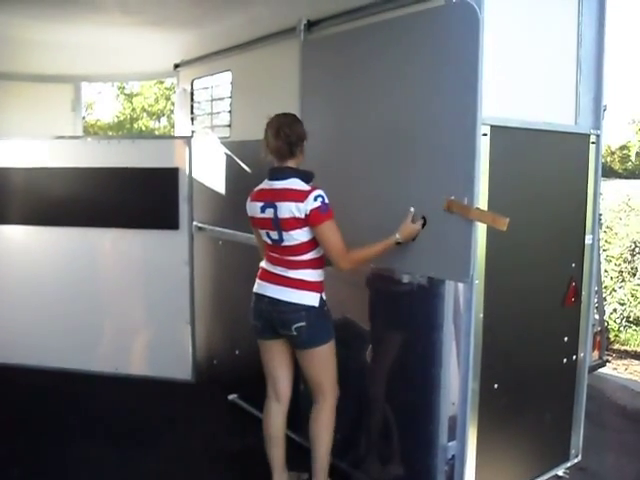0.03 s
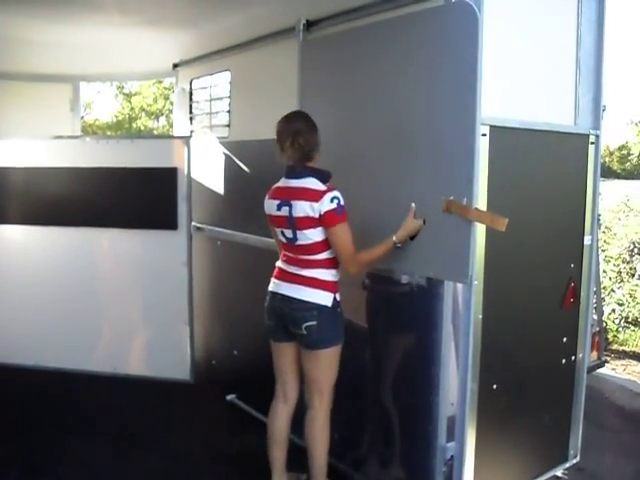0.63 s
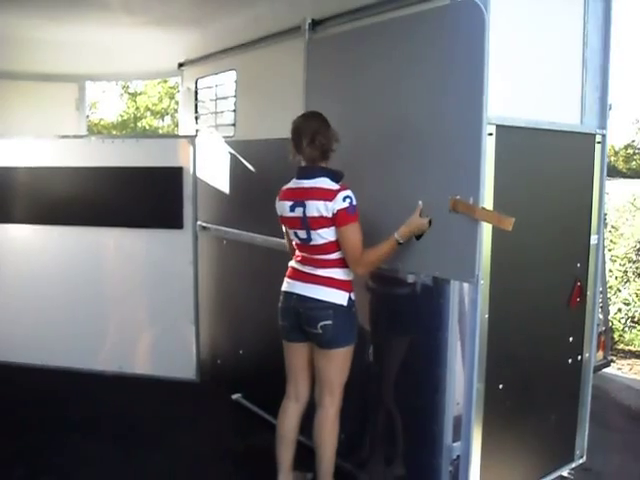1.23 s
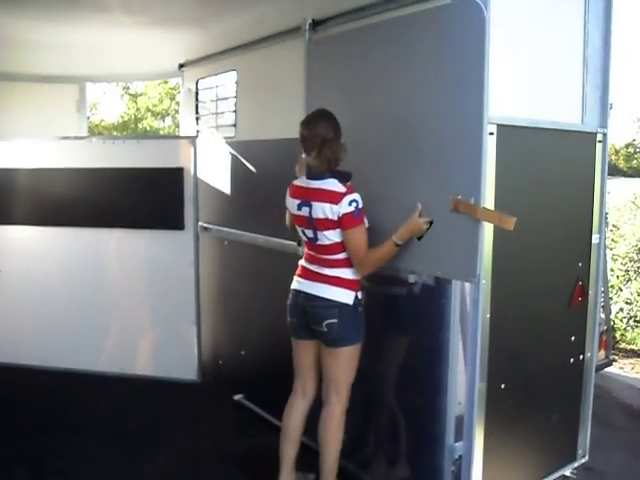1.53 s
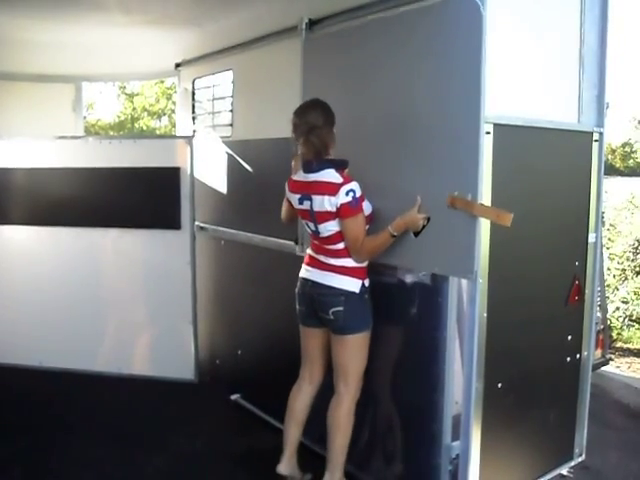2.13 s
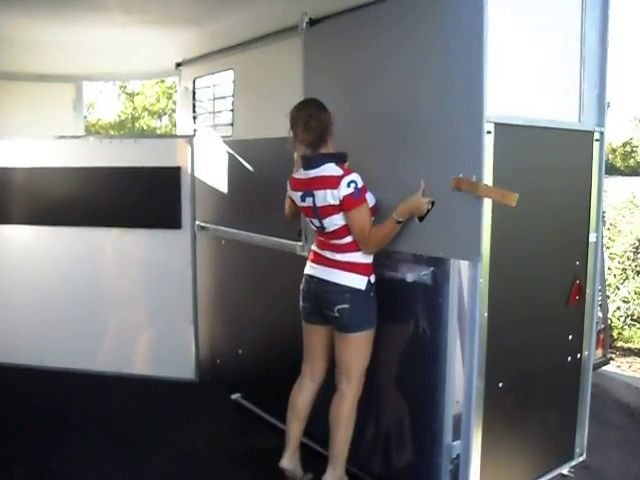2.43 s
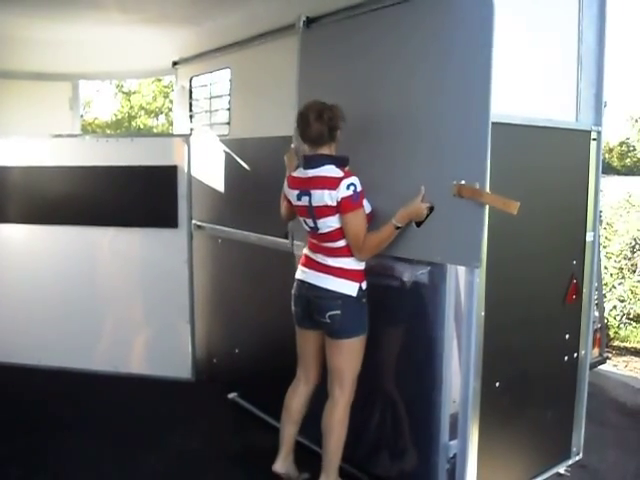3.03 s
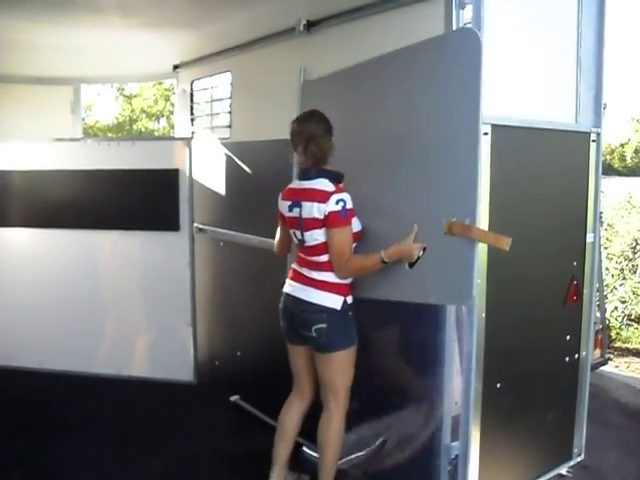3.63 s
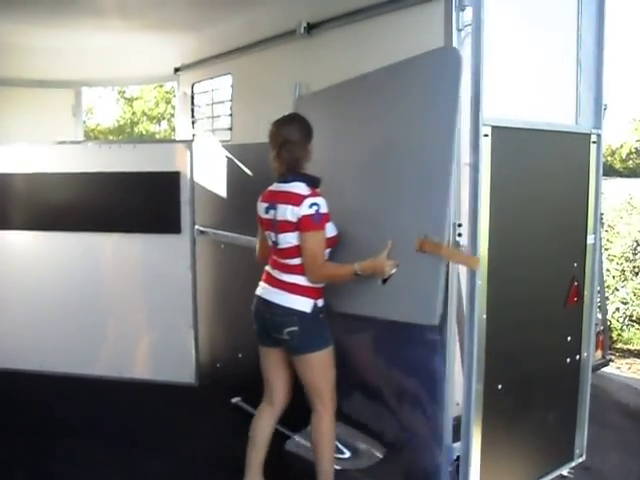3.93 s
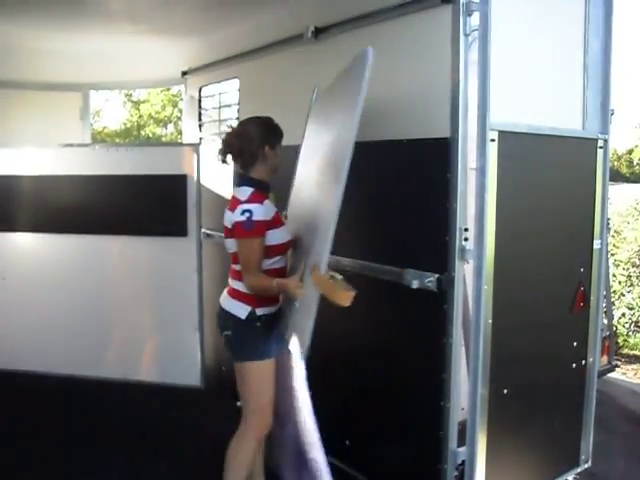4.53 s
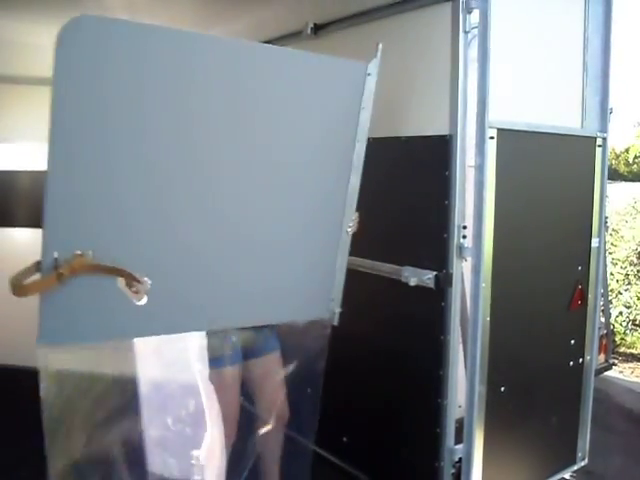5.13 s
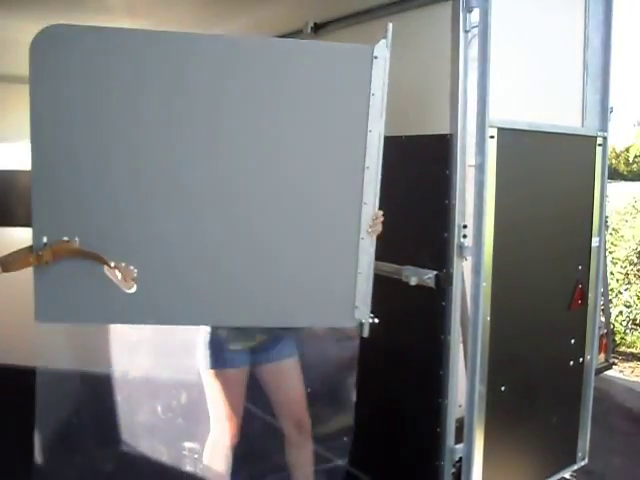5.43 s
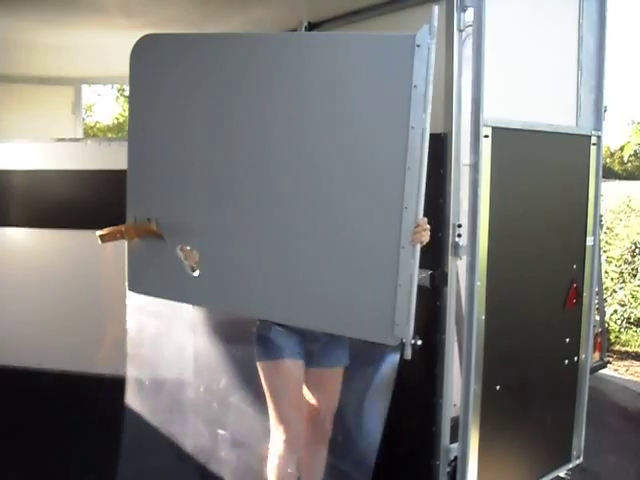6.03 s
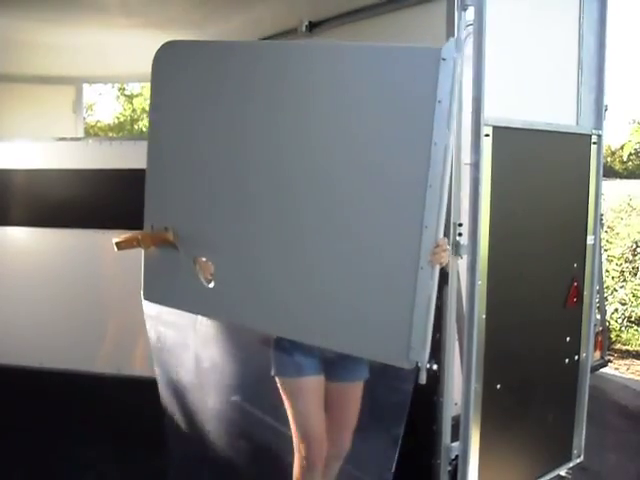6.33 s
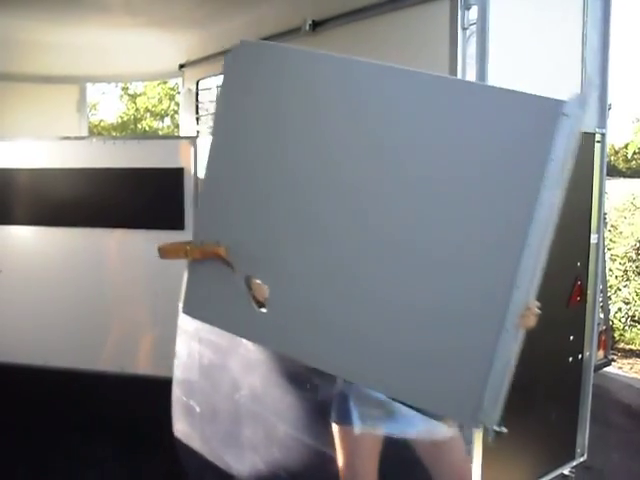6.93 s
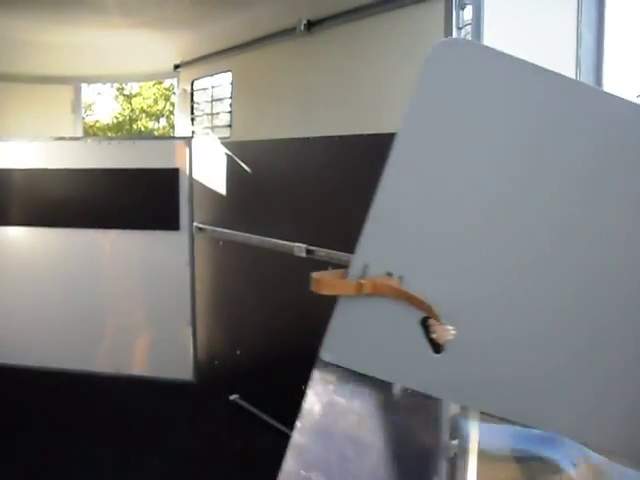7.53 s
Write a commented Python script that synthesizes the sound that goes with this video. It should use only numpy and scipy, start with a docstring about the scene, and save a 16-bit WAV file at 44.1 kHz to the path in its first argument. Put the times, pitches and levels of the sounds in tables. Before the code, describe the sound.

Inside a horse trailer, faint distant traffic hisses throughout, with a barely audible cricket and a few tiny ticks at first. At about 1.8 seconds a heavy divider panel rubs and knocks on its steel hinge pins. It scrapes again, and around 2.3 seconds comes a quick cluster of loud, hollow, ringing clunks with steel clacks and a short echo off the walls. More scrapes and three separate clunks follow between 2.9 and 3.5 seconds. A breeze, puffing lightly from about 2 seconds, rumbles and thumps on the microphone most strongly from 4 to 6.5 seconds. Under it, fittings tick, the panel's plastic skirt rustles softly, and lighter knocks land at 4.6 and 5.3 seconds. Near 5.9 seconds the plastic buckles with one short, blunt squeak. Sharper metal ticks sound just after 7 seconds, followed by a soft, dull scrape.

```python
"""Inside a horse trailer, a heavy divider panel is worked off its hinge pins.
It scrapes and clunks: each blow is a boom, a ring, a hollow knock and a steel clack, with a short tail
off the walls. Its steel fittings tick; its plastic skirt rustles and buckles once with a blunt squeak.
Underneath, distant traffic hisses, a cricket chirps faintly and a breeze puffs at the microphone."""
import sys
import numpy as np
from scipy import signal
from scipy.fft import rfft, irfft, next_fast_len
from scipy.io import wavfile
from scipy.ndimage import map_coordinates

SR = 44100
rng = np.random.default_rng(int(sys.argv[2]) if len(sys.argv) > 2 else 0)


def transcribe(signal):
    """Save signal, clipped to [-1, 1], as a 16-bit WAV file at the path in sys.argv[1]."""
    frames = np.atleast_2d(signal).T
    limited = np.clip(frames, -1, 1)
    pcm = np.round(limited * 32767).astype(np.int16)
    wavfile.write(sys.argv[1], SR, pcm)


N = 343980
TIME = np.arange(N) / SR
HIT_TIME = TIME[:SR // 3]  # seconds within a one-shot

# Table levels are relative: each layer adds its own trim.
# fader ride of the distant traffic: (time [s], level [dB])
TRAFFIC_RIDE = [(0.0, -49), (0.41, -51), (1.17, -51), (1.58, -46.5), (2.13, -50.5), (2.39, -48),
                (2.85, -50.5), (6.5, -54), (7.8, -53)]
# tone of the traffic, the low outdoor murk and the microphone's hiss: (frequency [Hz], level [dB])
TRAFFIC_EQ = [(100, 1), (450, -11), (700, 0.5), (950, 3.5), (1400, -3), (2100, -9), (3000, -19),
              (6000, -69)]
MURK_EQ = [(40, -22), (120, -2), (300, -0.5), (450, -7), (800, -11), (2000, -83)]
HISS_EQ = [(500, 1.5), (4000, 4), (6800, 0), (7400, 6), (7800, 1.5), (8300, 6), (8800, -1), (10200, -1),
           (11000, -19)]
# a far motor's hum and a thin electronic whine: (centre [Hz], half-width [Hz], level [dB])
HUM_BANDS = [(92.9, 8.5, -55), (184.1, 4.6, -60.5), (7800, 80, -72.5)]

# fader ride of the breeze between gusts: (time [s], level [dB])
BREEZE_RIDE = [(0.0, -51.5), (1.39, -48), (1.58, -48), (2.24, -39.5), (3.1, -48.5), (3.56, -37),
               (3.87, -44.5), (4.13, -37), (5.87, -40), (6.06, -41.5), (6.91, -45), (7.8, -46)]
# tone of the wind rumble and of the fine turbulence in an eddy: (frequency [Hz], level [dB])
RUMBLE_EQ = [(10, -8), (30, 2.5), (60, 0), (100, -6), (160, -13.5), (260, -29), (500, -31), (1500, -79)]
FLUTTER_EQ = [(60, 0.5), (150, 4), (260, -3), (350, -13.5), (600, -30.5), (2000, -75)]
# gusts at the microphone: (time [s], length [s], level [dB])
GUST_CUES = [(1.836, 0.088, -38.5), (2.084, 0.055, -38.5), (2.717, 0.072, -41), (4.114, .19, -36.5),
             (4.354, 0.13, -39), (4.76, 0.045, -34), (4.883, 0.12, -35.5), (5.086, 0.06, -34),
             (5.465, 0.215, -35), (5.856, 0.12, -33), (6.33, 0.13, -33), (6.862, 0.22, -38.5)]
# hard eddies thumping the microphone: (time [s], level [dB], width [s])
EDDY_CUES = [(4.12, -22.5, 0.0034), (4.204, -23.5, .0035), (4.292, -19, .003), (4.377, -18.5, 0.00094),
             (4.392, -18, 0.0019), (4.474, -21, 0.0011), (4.784, -22, 0.0019), (4.962, -16.5, 0.0035),
             (5.089, -22.5, 0.0042), (5.327, -18, .0022), (5.506, -18.5, .0017), (6.413, -23, 0.0013),
             (6.451, -21, 0.0015)]

# reverb time of the trailer: (frequency [Hz], t60 [s])
TRAILER_DECAY = [(150, 0.5), (500, 0.38), (1500, 0.2), (4000, 0.25), (10000, 0.072)]
# the plastic skirt sliding: (time [s], length [s], level [dB])
RUSTLE_CUES = [(.01, 0.046, -57), (2.74, 0.053, -61), (4.111, 0.077, -63), (4.177, 0.075, -54.5),
               (4.628, 0.086, -61), (4.863, 0.08, -61)]
# light ticks of the fittings: (time [s], level [dB], pitch [Hz])
TICK_CUES = [(0.0417, -55, 3930), (1.378, -54.5, 4150), (2.747, -51.5, 3650), (3.4018, -57, 3000),
             (3.6535, -55, 3230), (3.702, -54, 4040), (4.1333, -52, 3800), (4.7285, -50, 3650),
             (4.747, -52, 3400), (4.7629, -48, 3670), (4.8998, -48.5, 3300), (6.509, -58, 4600),
             (7.107, -42, 1480), (7.1637, -39, 1640), (7.163, -44, 3000)]
# tone of the plastic skirt and of steel on steel: (frequency [Hz], level [dB])
SKIRT_EQ = [(800, -30), (2500, 0.5), (4500, 3), (6500, -2.5), (10000, -17)]
STEEL_EQ = [(500, -21), (1400, 4), (2200, 0), (2900, 2), (4000, -3), (5200, -10), (7000, -15.5),
            (11000, -32)]

# tone of the whole panel flexing and of its dense resonances: (frequency [Hz], level [dB])
BOOM_EQ = [(30, -45), (80, -6), (150, 5.5), (250, 1), (400, -6), (550, -13), (1500, -70)]
BODY_EQ = [(60, -43), (140, -3), (400, 4.5), (560, -4.5), (750, -0.5), (1400, -6.5), (2100, -15),
           (3000, -34), (6000, -61)]
# ringing modes of the panel and of the hinge pin: (frequency [Hz], level [dB], t60 [s])
PANEL_RING = [(242, 9.5, 0.24), (377, 7, 0.17), (420, 3, 0.19), (479, -9, 0.32), (517, 0, 0.16),
              (604, 13, 0.12), (707, -7, 0.085), (811, -19.5, 0.33), (983, -35, 0.27), (1137, -14, 0.18),
              (1475, -7, 0.039), (1720, -38, 0.4)]
PIN_RING = [(2253, 7, 0.071), (3040, 8, 0.047), (2980, -11, 0.079), (3960, -1, 0.11), (4520, -22, .07)]
# the panel rubbing on its pins and the wall: (time [s], length [s], level [dB], high cut [Hz])
SCRAPE_CUES = [(1.831, 0.083, -38, 294), (2.171, 0.14, -35.5, 1700), (2.918, 0.13, -44, 570),
               (3.21, 0.092, -34.5, 2520), (4.639, 0.042, -43.5, 1200), (5.29, 0.06, -42.5, 2800),
               (7.432, 0.17, -45.5, 484)]
# blows on the hinge: (time [s], rebound gap [s], boom [dB], ring [dB], knock [dB], clack [dB])
CLUNK_CUES = [(1.824, 0.024, -51, -46, -38.5, -55), (2.206, 0.035, -40, -44, -39, -50),
              (2.267, 0.021, -43, -44, -35.5, -54), (2.311, 0.017, -29.5, -31, -35, -44),
              (2.3269, 0.007, -35.5, -33, -34.5, -39.5), (2.337, .015, -29, -25.5, -26.5, -49),
              (3.0281, 0.019, -42.5, -44, -34.5, -43.5), (3.2481, 0.0092, -39.5, -40, -34, -39),
              (3.4741, .016, -31.5, -31, -29.5, -45.5), (4.576, 0.031, -50, -50, -41.5, -51),
              (5.313, 0.017, -46, -52, -40.5, -49)]


def amp(db):
    """Decibels to gain."""
    return 10 ** (np.asarray(db) / 20)


def unit(x):
    """Scale to rms 1."""
    return x / np.sqrt(np.mean(x ** 2) + 1e-20)


def along(points, hz):
    """Read (frequency [Hz], value) points on a log frequency axis."""
    point_hz, values = np.transpose(points)
    return np.interp(np.log(hz + 1), np.log(point_hz + 1), values)


def ride(rows):
    """A fader ride: (time [s], level [dB]) rows read at every sample."""
    return np.interp(TIME, *np.transpose(rows))


def wobble(rate):
    """A smooth random curve, rate knots a second."""
    return map_coordinates(rng.standard_normal(int(N * rate / SR) + 4), [TIME * rate])


def swell(start, hold, attack_s, release_s):
    """An envelope held at 1 from start, with an exponential rise before and fall after."""
    return np.exp(np.minimum(TIME - start, 0) / attack_s - np.maximum(TIME - start - hold, 0) / release_s)


def add(track, start, sound):
    """Mix a sound into the track at start seconds."""
    part = track[max(0, round(start * SR)):][:len(sound)]
    part += sound[:len(part)]


def filtered(x, response):
    """Equalise x with a gain that is a function of frequency."""
    size = next_fast_len(len(x) + SR // 2)
    return irfft(rfft(x, size) * response(np.fft.rfftfreq(size, 1 / SR)), size)[:len(x)]


def noise(eq):
    """Coloured noise of rms 1."""
    return unit(filtered(rng.standard_normal(N), lambda hz: amp(along(eq, hz))))


def impulse(eq, size=2048):
    """A minimum-phase click of energy 1 with this tone."""
    cepstrum = irfft(np.log(amp(along(eq, np.fft.rfftfreq(size, 1 / SR)))))
    cepstrum[1:size // 2] *= 2
    cepstrum[size // 2:] = 0
    click = irfft(np.exp(rfft(cepstrum)))
    return click / np.linalg.norm(click)


def in_trailer(click, direct):
    """A contact between the walls: the dry click at gain direct, then a fresh tail of reflections."""
    hz, t, spectrum = signal.stft(rng.standard_normal(len(HIT_TIME)), SR, nperseg=256)
    decay = amp(-60 * t / along(TRAILER_DECAY, hz)[:, None])
    tail = signal.istft(spectrum * decay, SR, nperseg=256)[1][:len(HIT_TIME)]
    tail *= 1 + 0.47 * np.exp(-HIT_TIME / 0.0065)  # near walls answer first
    tail[0] -= direct
    return signal.fftconvolve(tail, click)[:len(HIT_TIME)]


def ring(modes, scatter_db):
    """Struck modes dying away, each with a new strength and polarity on every hit."""
    draws = rng.standard_normal((len(modes), 2))
    tones = 0
    for (hz, db, t60), (strength, polarity) in zip(modes, draws):
        envelope = amp(db + scatter_db * strength - 60 * HIT_TIME / t60)
        tones += np.sign(polarity) * envelope * np.sin(2 * np.pi * hz * HIT_TIME)
    return tones / np.sqrt(sum(amp(db) ** 2 for hz, db, t60 in modes))


def friction(length, response, slips_per_s):
    """One rub: random slips under an arch of pressure, each ringing the response."""
    slipping = rng.random(len(HIT_TIME)) < slips_per_s / SR
    slips = unit(slipping * rng.standard_normal(len(HIT_TIME)))
    pressure = np.sin(np.pi * np.clip(HIT_TIME / length, 0, 1))
    return signal.fftconvolve(slips * pressure, response / np.linalg.norm(response))


def background():
    """The bed: distant traffic, low outdoor murk, narrow bands of hum and the microphone's hiss."""
    drift_db = 0.4 * wobble(6)
    traffic = amp(ride(TRAFFIC_RIDE) + 1.0 + drift_db) * noise(TRAFFIC_EQ)
    murk = amp(-52.5 + 0.9 * drift_db) * noise(MURK_EQ)
    hums = np.zeros(N)
    for centre, half_width, db in HUM_BANDS:
        band = filtered(rng.standard_normal(N), lambda hz: 1 / (1 + ((hz - centre) / half_width) ** 4))
        hums += amp(db) * unit(band)
    return traffic + murk + hums + amp(-60.5) * noise(HISS_EQ)


def cricket(chirps_per_s=2.65, pitch_hz=4730):
    """A far cricket: chirps of three short syllables on one slightly wavering pitch."""
    cycle = chirps_per_s * (TIME - 0.04) + 0.077 * wobble(1.0)
    chirp = np.clip(0.82 * np.cos(2 * np.pi * cycle), 0, 1)
    syllable = np.cos(8 * np.pi * cycle) ** 4
    tone = np.sin(2 * np.pi * np.cumsum(pitch_hz + 12 * wobble(40)) / SR)
    return amp(-63.5) * chirp * syllable * tone


def breeze(strong_gust_db=-27, flutter_db=-8.5, flutter_growth=1.63):
    """Wind on the microphone: a rumble that swells and flutters in gusts, and thumps from hard eddies."""
    gust = sum(amp(db) * swell(start, length, attack_s=0.011, release_s=0.018)
               for start, length, db in GUST_CUES)
    lull = amp(ride(BREEZE_RIDE) + 1.5 + 1.5 * wobble(13))
    out = np.hypot(lull, gust) * noise(RUMBLE_EQ)
    strength = gust / amp(strong_gust_db)
    turbulence = amp(strong_gust_db + flutter_db + 3 * wobble(30)) * strength ** flutter_growth
    middle = HIT_TIME.mean()
    lag = HIT_TIME - middle
    for time, db, width in EDDY_CUES:
        spread = (lag / width) ** 2
        thump = np.exp(-spread / 18) / 3 - np.exp(-spread / 2)  # a pressure dip between two soft rises
        breakup = amp(2 * db - 1.0) * np.exp(-(lag / 0.0096) ** 2)  # strong eddies break up most
        add(out, time - middle, amp(db) * thump)
        add(turbulence, time - middle, breakup)
    return out + turbulence * noise(FLUTTER_EQ)


def skirt_buckle(peak_s=5.914, peak_hz=500, top_hz=604, octaves_per_s=80):
    """The plastic skirt buckles with a blunt, rough squeak: its pitch climbs as the bend tightens."""
    octaves = np.clip(octaves_per_s * (TIME - peak_s), -2, np.log2(top_hz / peak_hz))
    jitter = 1 + 0.105 * wobble(300)
    phase = 2 * np.pi * np.cumsum(peak_hz * 2 ** octaves * jitter) / SR
    edges = dict(attack_s=0.014, release_s=0.005)
    squeak = swell(peak_s, hold=0, **edges) * np.sin(phase)
    overtone = amp(-15.5) * swell(peak_s, hold=0.026, **edges) * np.sin(2 * phase)
    roughness = 1 + 0.32 * wobble(400)
    return amp(-31) * roughness * (squeak + overtone)


def skirt_rustles():
    """The hanging plastic skirt slides in short, bright rubs."""
    out = np.zeros(N)
    for start, length, db in RUSTLE_CUES:
        crinkle = in_trailer(impulse(SKIRT_EQ), direct=33)
        add(out, start, amp(db) * friction(length, crinkle, slips_per_s=1000))
    return out


def fitting_ticks(t60_s=0.016):
    """Small steel parts tick with a crack and a short ping; larger, lower parts crack less."""
    out, steel = np.zeros(N), impulse(STEEL_EQ)
    for start, db, hz in TICK_CUES:
        ping = np.sin(2 * np.pi * hz * HIT_TIME) * amp(3.5 - 60 * HIT_TIME / t60_s)
        crack = amp(-7.0) * hz / 3500 * in_trailer(steel, direct=6.6)
        add(out, start, amp(db) * (ping + crack))
    return out


def panel_scrapes():
    """The panel drags on its pins and the wall, and the slips sound its body; a soft rub is dull."""
    out, body = np.zeros(N), impulse(BODY_EQ)
    for start, length, db, high_cut_hz in SCRAPE_CUES:
        contact = signal.butter(2, [190, high_cut_hz], "band", fs=SR, output="sos")
        grain = signal.sosfilt(contact, in_trailer(body, direct=49))
        add(out, start, amp(db) * friction(length, grain, slips_per_s=1200))
    return out


def panel_clunks(rebound_loss_db=5.5, clack_lift_db=0.5):
    """Steel meets steel at the hinge; the panel booms and rebounds twice, softer and a touch brighter."""
    out = np.zeros(N)
    flex, body, steel = impulse(BOOM_EQ), impulse(BODY_EQ), impulse(STEEL_EQ)
    for start, gap, boom_db, ring_db, knock_db, clack_db in CLUNK_CUES:
        for bounce in range(3):
            boom = amp(boom_db - 5.0) * in_trailer(flex, direct=40)
            modes = amp(ring_db - 3.5) * ring(PANEL_RING, scatter_db=3.0)
            knock = amp(knock_db - 5.5) * in_trailer(body, direct=17)
            crack = amp(-7.0) * in_trailer(steel, direct=12)
            pin = amp(-3.5) * ring(PIN_RING, scatter_db=5.0)
            clack = amp(clack_db + bounce * clack_lift_db) * (crack + pin)
            hit = boom + modes + knock + clack
            add(out, start + bounce * gap, amp(-bounce * rebound_loss_db) * hit)
    return out


def scene():
    """The mono mix: the divider up front, the outdoors behind it."""
    divider = panel_clunks() + panel_scrapes() + fitting_ticks() + skirt_buckle() + skirt_rustles()
    return (divider + breeze() + cricket() + background())[None]


def record(dry, high_cut_hz=11400):
    """A brick-wall high cut takes the air off the top of the mix."""
    return np.array([filtered(channel, lambda hz: hz < high_cut_hz) for channel in dry])


dry = scene()
out = record(dry)
transcribe(out)
```